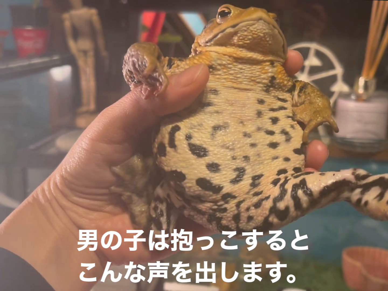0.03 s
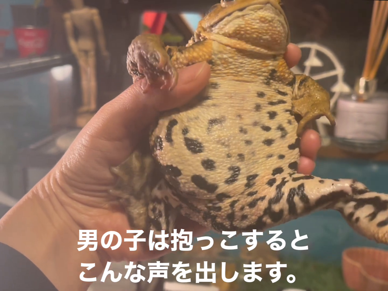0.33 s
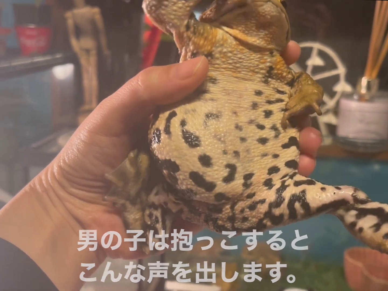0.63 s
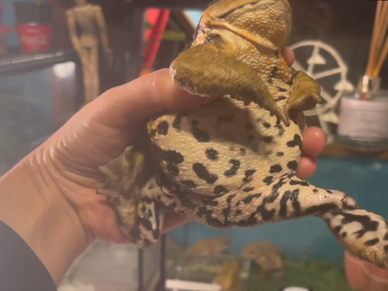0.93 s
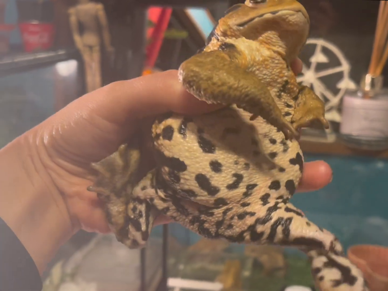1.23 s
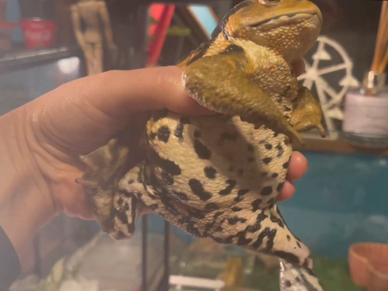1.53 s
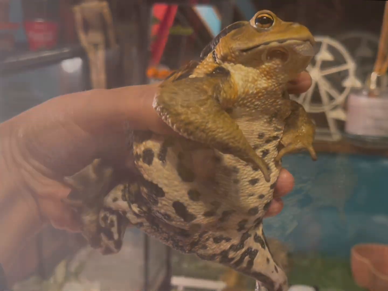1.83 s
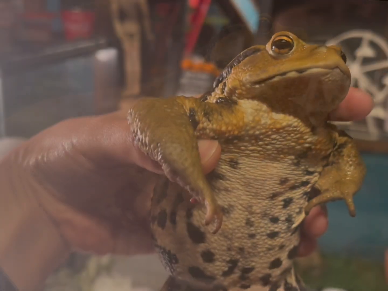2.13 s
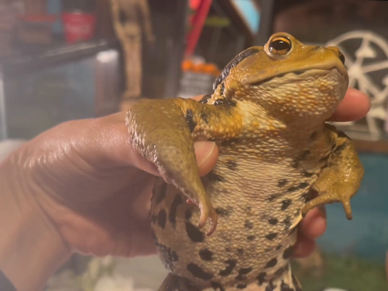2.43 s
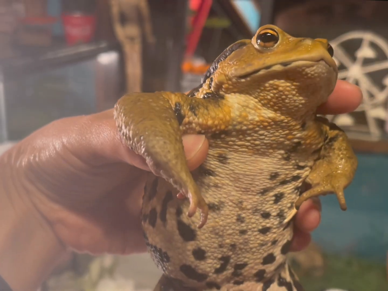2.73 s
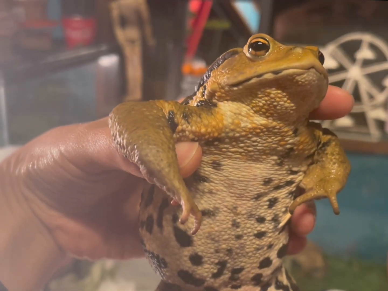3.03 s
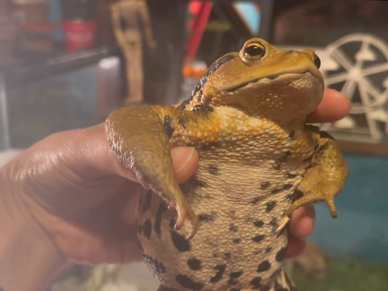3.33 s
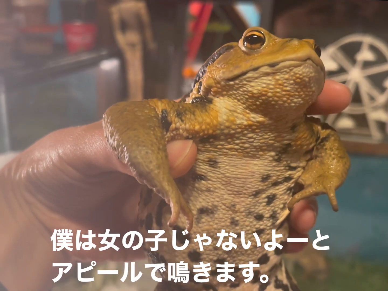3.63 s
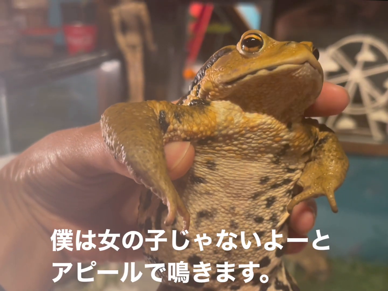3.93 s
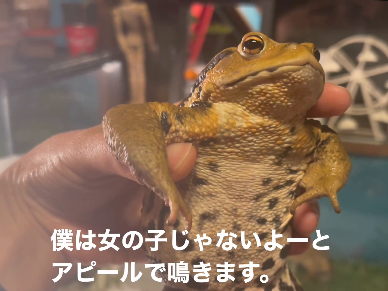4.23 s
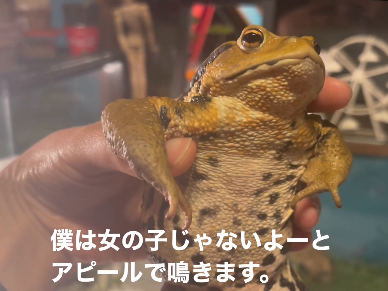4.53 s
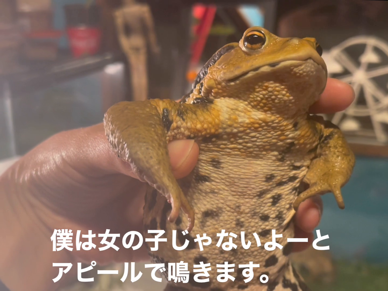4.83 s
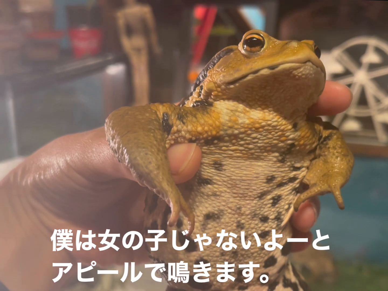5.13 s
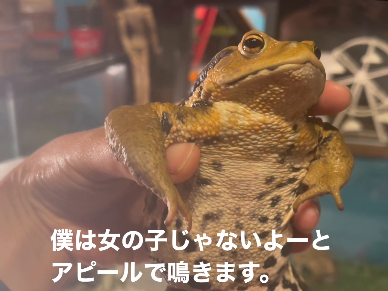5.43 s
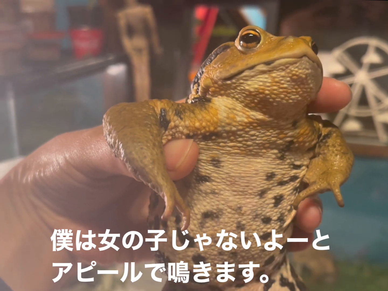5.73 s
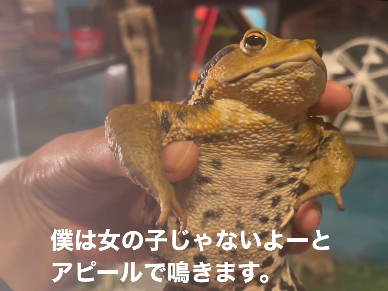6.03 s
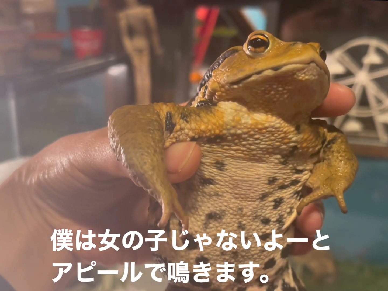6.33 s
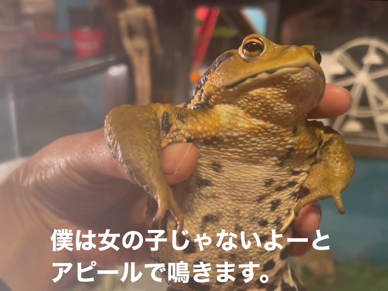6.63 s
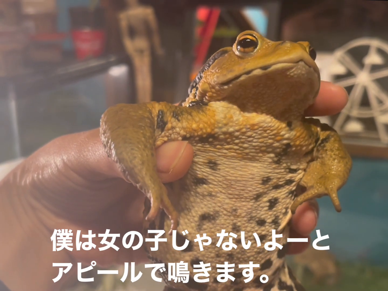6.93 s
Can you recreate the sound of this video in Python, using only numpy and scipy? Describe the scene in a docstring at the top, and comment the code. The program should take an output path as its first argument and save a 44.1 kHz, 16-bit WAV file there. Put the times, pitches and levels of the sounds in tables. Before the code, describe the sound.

A toad gives short, rattling chirps close up, singly and in small groups, over faint room hum and soft clock ticks.

```python
"""Short rattling chirps, close up in a small quiet room: the release calls of a hand-held male toad.
Each squeeze of air drives his vocal cords into a tone that arches up and sags;
most chirps end in a soft clean peep as the air runs out.
Behind them the hand shifts its grip, a clock ticks faintly and appliances hum."""
import sys
import numpy as np
from scipy import signal
from scipy.fft import rfft, irfft, next_fast_len
from scipy.io import wavfile
from scipy.ndimage import uniform_filter1d, map_coordinates

SR = 44100
rng = np.random.default_rng(int(sys.argv[2]) if len(sys.argv) > 2 else 0)


def wrap_up_sound(samples):
    """Save the sound to the file named by the first command line argument, as 16-bit audio."""
    columns = np.atleast_2d(samples).T
    # keep every value between -1 and 1, then stretch to whole-number steps
    tamed = np.clip(columns, -1, 1)
    steps = np.round(tamed * 32767).astype(np.int16)
    wavfile.write(sys.argv[1], SR, steps)


N = 308259

SLACK_HZ = 422.8  # pitch of the relaxed vocal cords
# resonances of throat and body wall: f/Hz, gain/dB
THROAT_EQ = [(90, -29.5), (220, -4), (330, -19.5), (440, -1.5), (650, 0), (800, 2), (1000, -5.5),
             (1320, -13.5), (1600, -17), (2020, -13), (2350, -25), (2800, -33), (4000, -50), (6000, -76.5)]


def chirps(taut_hz=627.1, jitter=0.015, attack_s=0.011, hold=0.36, shimmer_db=3):
    """A squeeze of air arches the pitch up and lets it sag; the cords rattle in twos or threes."""
    # calls: t/s, length/s, top pitch/Hz, drive level/dB, softness of the overtones
    calls = [(0.2449, 0.053, 590.5, -39, -0.22), (1.89, 0.082, 684.2, -25.5, 0.19),
             (2.3202, 0.068, 655.8, -25.5, 0.29), (3.4848, 0.085, 644, -25, 0.28),
             (3.709, .064, 606.5, -29, 0.51), (5.68, 0.063, 615.6, -27.5, 0.39),
             (5.891, .084, 679.5, -25.5, 0.21), (6.1609, 0.085, 715.5, -23, 0.23),
             (6.7334, 0.061, 613.7, -28, 0.81)]
    # air through the cords: f/Hz, gain/dB
    rasp_eq = [(1500, -32), (2800, -10.5), (3300, -11), (3800, -14.5), (4600, -24), (5400, -9.5),
               (5850, -13), (7200, 1.5), (8200, -4), (9600, -4.5), (10400, -20.5), (11200, -20),
               (11800, -35), (13000, -27.5)]
    tone, air = np.zeros(N), np.zeros(N)
    for start, length, top_hz, db, softness in calls:
        n = int(length * 1.3 * SR)  # leaves time to die away
        t = np.arange(n) / SR
        push, air_left = squeeze(t / length)
        pressure = np.abs(push * air_left)
        hz = SLACK_HZ + (top_hz - SLACK_HZ) * pressure
        phase = 2 * np.pi * np.cumsum(hz * (1 + jitter * wobble(n, 385))) / SR - np.pi / 2
        # taut cords stress every second cycle; looser ones every third, and the stress slips more
        group = np.where(hz < taut_hz, 3, 2)
        slip = np.where(hz < taut_hz, 1.0, 0.4) * wobble(n, 99)
        rattle = 0.78 * pressure ** 0.36 * uniform_filter1d(np.cos(phase / group + slip), size=16)
        fade_db = -22.5 * np.maximum((t / length - hold) / (1 - hold), 0) ** 1.88
        attack = 1 - np.exp(-t / attack_s)
        drive = amp(db + fade_db + shimmer_db * np.tanh(wobble(n, 501))) * attack
        even_db = 2.5 - 23.5 * (1 - air_left)  # the tone hollows as the air drains
        add(tone, start, drive * (1 + rattle) * pulses(phase, softness, even_db))
        # the rasp is strongest when the cords close hard, and dies before the tone
        rasp_db = -16.5 - 9.5 * softness + 0.93 * fade_db
        add(air, start, drive * (1 + 0.56 * rattle) * amp(rasp_db) * rasp(phase, rasp_eq, voiced=0.65))
    return resonate(tone, THROAT_EQ), air


def squeeze(progress, start_pressure=0.45, crest=0.25, empty=0.92):
    """Air pressure over a chirp: a quick push up to the crest, then a slower draining (each 0-1)."""
    push = start_pressure + (1 - start_pressure) * np.sin(np.pi / 2 * np.clip(progress / crest, 0, 1))
    air_left = 0.5 + 0.5 * np.cos(np.pi * np.clip((progress - crest) / (empty - crest), 0, 1))
    return push, air_left


def pulses(phase, softness, even_db=0, count=19):
    """One puff per cycle; soft closing weakens the overtones, symmetric swinging the even ones."""
    return np.sqrt(2) * sum(np.cos(k * phase) / k ** softness * (1 if k % 2 else amp(even_db))
                            for k in range(1, count + 1))


def rasp(phase, spectrum, voiced):
    """Treble of the cords: a snap and a puff of hiss in every cycle."""
    snaps = unit(resonate(pulses(phase, 0), spectrum))
    hiss = unit((2 + np.cos(phase)) * noise(len(phase), spectrum))
    return np.sqrt(voiced) * snaps + np.sqrt(1 - voiced) * hiss


def peeps(glide_octaves=0.033, crest=0.63, width=0.27):
    """The last air swings the slack cords gently: a mellow tone with a thin whistle on top."""
    # chirp endings: t/s, length/s, pitch/Hz, drive level/dB
    endings = [(0.269, 0.041, 514, -30), (1.951, 0.027, 448, -32.5), (2.386, 0.02, 441, -37),
               (3.581, 0.047, 428.3, -32.5), (5.743, 0.028, 432, -33), (5.964, .031, 452, -30.5),
               (6.24, 0.022, 442, -35), (6.788, 0.02, 449, -40)]
    # treble of a peep: f/Hz, gain/dB
    whistle_eq = [(2500, -24.5), (4000, -7.5), (5500, -19.5), (6250, -0.5), (7300, -2), (7900, -16.5),
                  (9000, -4), (10500, -31)]
    tone, air = np.zeros(N), np.zeros(N)
    for start, length, hz, db in endings:
        progress = np.linspace(0, 1, int(length * SR))
        phase = 2 * np.pi * np.cumsum(hz * 2 ** (glide_octaves * (progress - 0.5))) / SR
        swell = np.exp(-((progress - crest) / width) ** 2 / 2)
        drive = amp(db) * swell * np.sqrt(np.abs(np.sin(np.pi * progress)))
        whistle_db = -48.5 + 0.2469 * (hz - SLACK_HZ)  # tighter cords whistle more
        add(tone, start, drive * pulses(phase, softness=1.59, even_db=0.5))
        add(air, start, drive * amp(whistle_db) * rasp(phase, whistle_eq, voiced=0.7))
    return resonate(tone, THROAT_EQ), air


def hand():
    """Fingers shift on the toad: a soft thud and a brush of skin."""
    # grip shifts: t/s, length/s, thud level/dB, rub level/dB
    grips = [(0.646, 0.034, -58, -84), (0.93, 0.072, -55.5, -82), (0.973, .06, -65, -71),
             (1.13, 0.056, -53, -90), (1.19, 0.028, -64, -73.5), (1.467, 0.08, -50, -87),
             (1.538, 0.036, -51.5, -81), (1.609, 0.04, -60.5, -74)]
    # dull finger thud: f/Hz, gain/dB
    thud_eq = [(35, -31), (75, 9), (170, 2.5), (300, -9), (700, -31), (2000, -69)]
    # skin on skin: f/Hz, gain/dB
    rub_eq = [(300, -13), (1300, -1.5), (2200, -9), (3500, -18), (7000, -20), (10000, -18), (13000, -22.5)]
    out = np.zeros(N)
    for start, length, thud_db, rub_db in grips:
        n = int(length * SR)
        touch = amp(thud_db) * noise(n, thud_eq) + amp(rub_db) * noise(n, rub_eq)
        add(out, start, np.sin(np.linspace(0, np.pi, n)) * touch)
    return out


def clock(t60=0.17, rise_s=0.0028):
    """Ticks from across the room, arriving mostly as reverberation."""
    # ticks: t/s, level/dB
    ticks = [(0.885, -82), (2.880, -63.5), (3.864, -68), (4.88, -62.5), (6.876, -64)]
    # resonances of the case: f/Hz, gain/dB
    case_eq = [(500, -28), (1050, -11), (1350, 12), (1600, -19), (1850, 6), (2200, -27), (2600, -3),
               (3000, -24), (5500, -16.5), (9000, -19), (12000, -32)]
    out, t = np.zeros(N), np.arange(SR // 4) / SR
    for start, db in ticks:
        add(out, start, amp(db - 60 * t / t60) * (1 - np.exp(-t / rise_s)) * noise(len(t), case_eq))
    return out


def background(mains_hz=50, fan_hz=241, whine_hz=11220, coil_hz=5070):
    """Dull room noise with mains hum, a fan tone, thin electric whines and microphone hiss."""
    # room tone: f/Hz, gain/dB
    room_eq = [(18, -39.5), (30, -19), (42, -15), (58, 1.5), (100, -5), (170, -8), (240, -7), (300, -11),
               (680, -19.5), (1000, -22), (2200, -33), (2700, -40.5), (5000, -47), (9000, -48)]
    # its stereo width: f/Hz, side minus mid/dB
    width_eq = [(50, -16.5), (150, -10.5), (320, -6), (480, 1.5), (800, 3), (2000, -1.5), (5000, -6)]
    # microphone hiss: f/Hz, gain/dB
    hiss_eq = [(2500, -30), (4000, -9.5), (6500, -2.5), (8500, 5), (10300, 10.5), (11300, 9), (12200, -7),
               (13200, -72)]
    # fader ride of the mains hum: t/s, level before trim/dB
    hum_ride = [(0.0, -83.5), (1.85, -69), (1.99, -54), (2.1, -62), (2.51, -64), (3.79, -62.5), (6.99, -73)]
    t = np.arange(N) / SR
    room_db = -62.5 + 5 * np.exp(-((t - 2.11) / 0.24) ** 2)  # one brief surge
    hum_db = np.interp(t, *np.transpose(hum_ride)) + 1.6 + 1.1 * np.tanh(wobble(N, 9))
    whine_db = -89 - 4.5 * (t > 2.35)  # steps down once
    mid = amp(room_db) * noise(N, room_eq) + amp(-86) * noise(N, hiss_eq)
    mid += amp(hum_db) * drone(mains_hz, drift_rad=0.33, rate=2.5)
    mid += amp(-75) * drone(fan_hz, drift_rad=0.46, rate=2.9)
    mid += amp(whine_db) * drone(whine_hz, drift_rad=1.4, rate=150)
    mid += amp(-108) * sum(drone(k * coil_hz, drift_rad=0.5, rate=3) for k in (1, 2))
    side = amp(room_db) * filtered(noise(N, room_eq), lambda hz: amp(along(width_eq, hz)))
    side += amp(-96) * rng.standard_normal(N)
    return np.array([mid + side, mid - side])


def drone(hz, drift_rad, rate):
    """An appliance tone of rms 1 with a wandering phase."""
    t = np.arange(N) / SR
    return np.sqrt(2) * np.sin(2 * np.pi * hz * t + drift_rad * wobble(N, rate))


def with_echoes(x):
    """Close surfaces comb the sound, so gliding overtones rise and dip."""
    # reflections off shelf and tank glass: delay/s, level/dB
    reflections = [(.0031, -18), (.0058, -21.5), (.0097, -32), (0.0137, -25.5)]
    out = x.copy()
    for delay, db in reflections:
        add(out, delay, amp(db) * x)
    return out


def room(x):
    """Short diffuse reverb off the walls, different in each channel."""
    # reverb time: f/Hz, t60/s
    decay = [(200, 0.085), (1000, 0.27), (4000, 0.19), (10000, 0.11)]
    hz, t, bands = signal.stft(rng.standard_normal((2, SR // 3)), SR, nperseg=256)
    tail = signal.istft(bands * amp(-60 * t / along(decay, hz)[:, None]), SR, nperseg=256)[1]
    tail = np.pad(tail / np.linalg.norm(tail[0]), ((0, 0), (SR // 200, 0)))  # 5 ms pre-delay
    return signal.fftconvolve(x[None], tail, axes=1)[:, :N]


def place(x):
    """The toad is a little louder on the left, and his upper partials reach that side first."""
    # pan: f/Hz, left minus right/dB
    balance = [(400, 3), (700, 3.5), (1300, 2.5), (2200, 2.5), (2800, 4), (3700, 7.5), (4800, 5), (6000, 1),
               (7100, 5), (8300, 0), (10000, 0.5)]
    # arrival: f/Hz, right phase lag/rad
    lag = [(1900, 0), (3000, 2), (3800, 0)]

    def response(hz):
        gain = amp(along(balance, hz) / 2)
        return np.array([gain, np.exp(-1j * along(lag, hz)) / gain])
    return filtered(x, response)


def amp(db):
    """Decibels to gain."""
    return 10 ** (np.asarray(db) / 20)


def unit(x):
    """Scale to rms 1."""
    return x / np.sqrt(np.mean(x ** 2) + 1e-20)


def along(points, hz):
    """Read (f/Hz, value) points on a log frequency axis."""
    freqs, values = np.transpose(points)
    return np.interp(np.log(hz + 1), np.log(freqs), values)


def wobble(n, rate):
    """A smooth random curve with rate knots a second."""
    return map_coordinates(rng.standard_normal(int(n * rate / SR) + 4), [np.arange(n) * rate / SR])


def filtered(x, response):
    """Apply a frequency response to x."""
    n = x.shape[-1]
    size = next_fast_len(n + 8192)
    return irfft(rfft(x, size) * response(np.fft.rfftfreq(size, 1 / SR)), size)[..., :n]


def noise(n, spectrum):
    """Coloured noise of rms 1."""
    return unit(filtered(rng.standard_normal(n), lambda hz: amp(along(spectrum, hz))))


def resonate(x, spectrum, size=4096):
    """Minimum-phase EQ: the body rings only after each pulse."""
    cepstrum = irfft(np.log(amp(along(spectrum, np.fft.rfftfreq(size, 1 / SR)))))
    cepstrum[1:size // 2] *= 2
    cepstrum[size // 2 + 1:] = 0
    return signal.fftconvolve(x, irfft(np.exp(rfft(cepstrum))))[:len(x)]


def add(track, start_s, x):
    """Mix x into the track from start_s on."""
    part = track[max(round(start_s * SR), 0):][:len(x)]
    part += x[:len(part)]


def scene():
    """The toad up close, the room around him."""
    tone, air = np.add(chirps(), peeps())
    # the nearest surfaces answer in mono, the far walls in stereo
    near = room(amp(-12.5) * air)[0]
    far = room(amp(-21) * tone + amp(-16) * air)
    toad = place(with_echoes(tone + air) + near) + far
    backdrop = hand() + clock() + background()
    return toad + backdrop * amp([[0.6], [-0.6]])  # leans slightly left


def record(dry, top_hz=13200):
    """The phone's two microphone ports differ in phase in the treble; nothing above top_hz passes."""
    # microphone pair: f/Hz, left phase lead/rad
    lead = [(2000, 0), (3300, 1.53), (6700, 0.4), (7400, 1.35), (8600, -1), (10300, -np.pi), (11600, -6),
            (12300, -7), (13200, -8.5)]
    return filtered(dry, lambda hz: (hz < top_hz) * np.exp(0.5j * np.outer([1, -1], along(lead, hz))))


dry = scene()
out = record(dry)
wrap_up_sound(out)
```